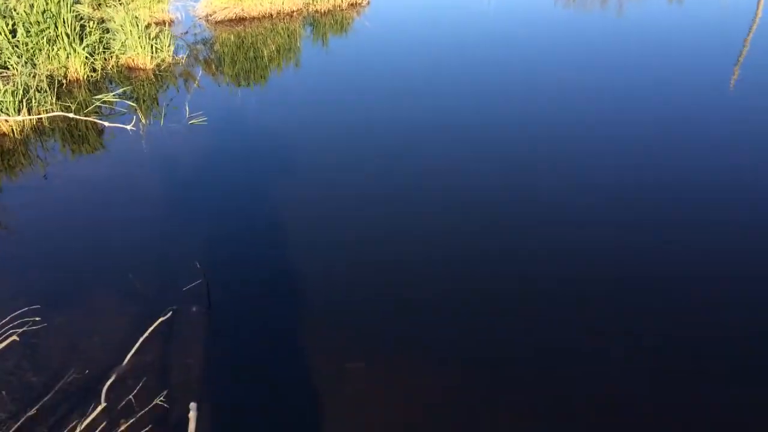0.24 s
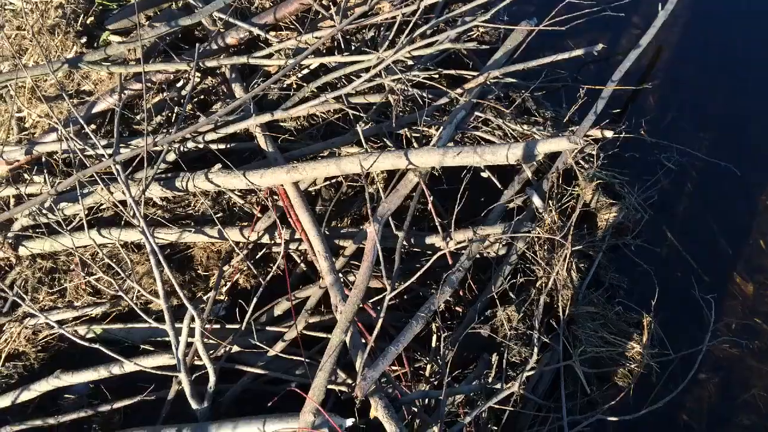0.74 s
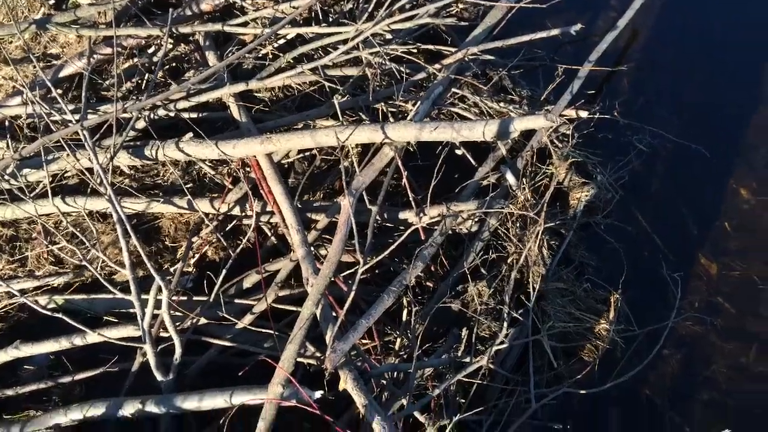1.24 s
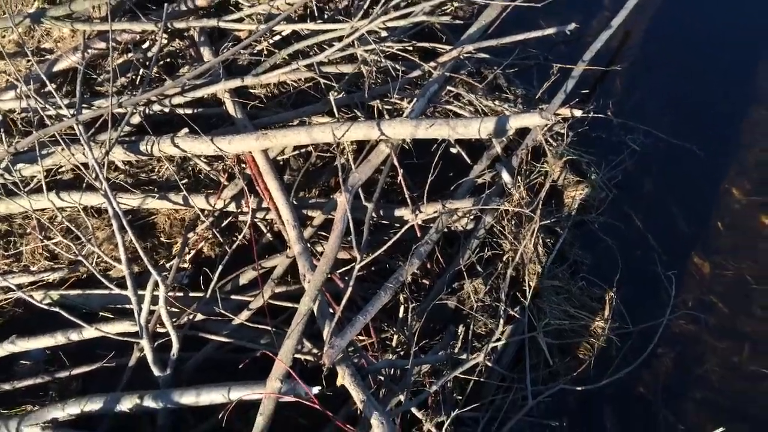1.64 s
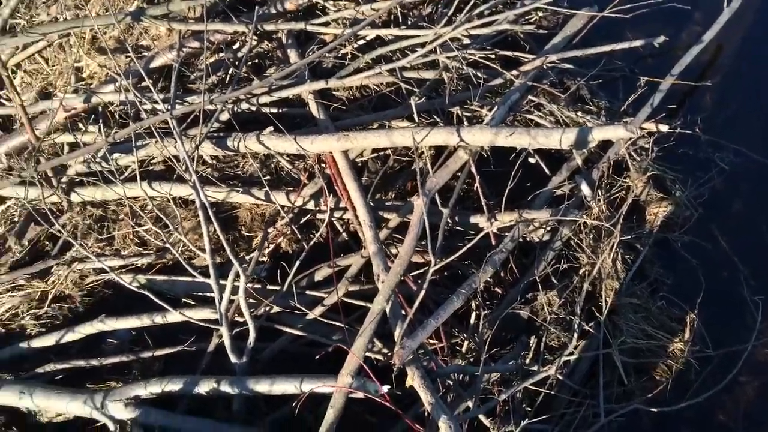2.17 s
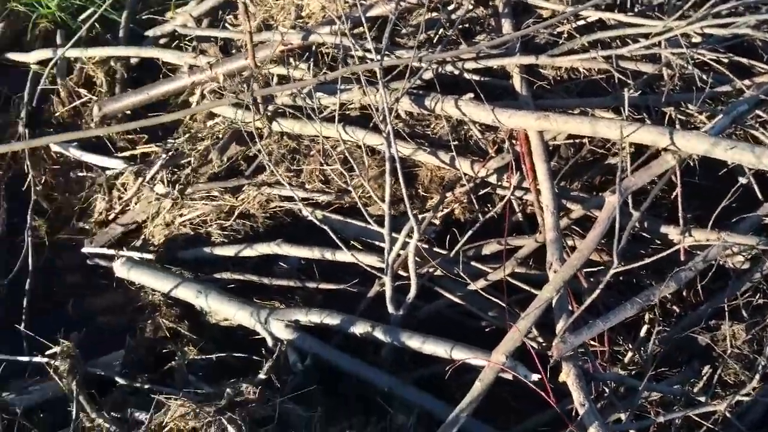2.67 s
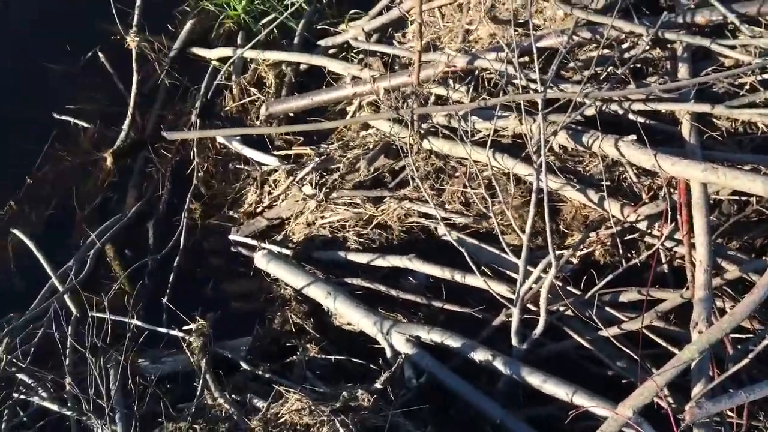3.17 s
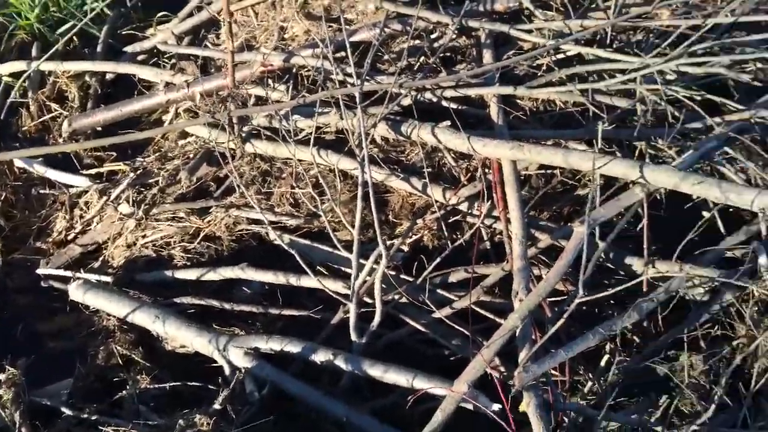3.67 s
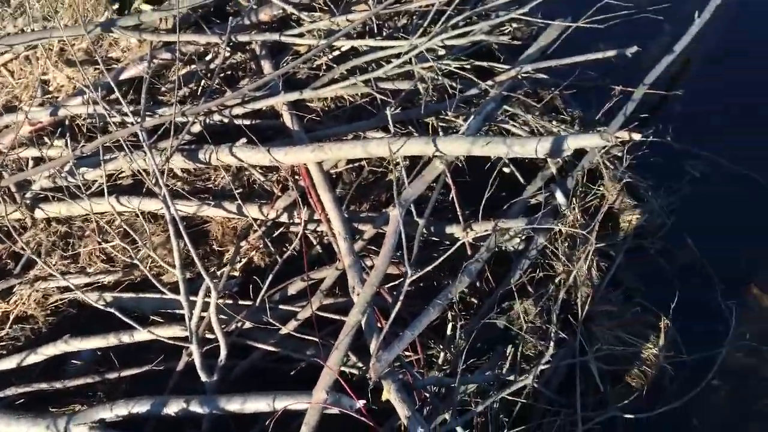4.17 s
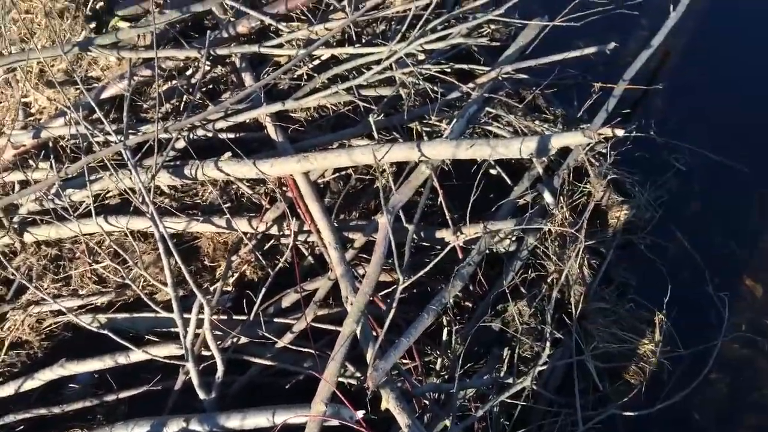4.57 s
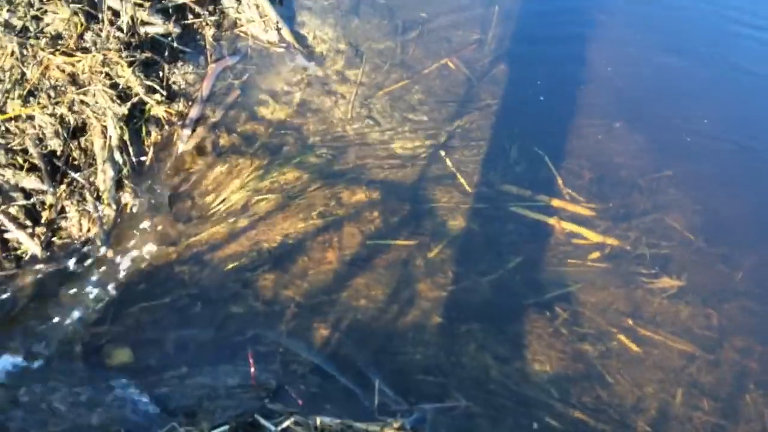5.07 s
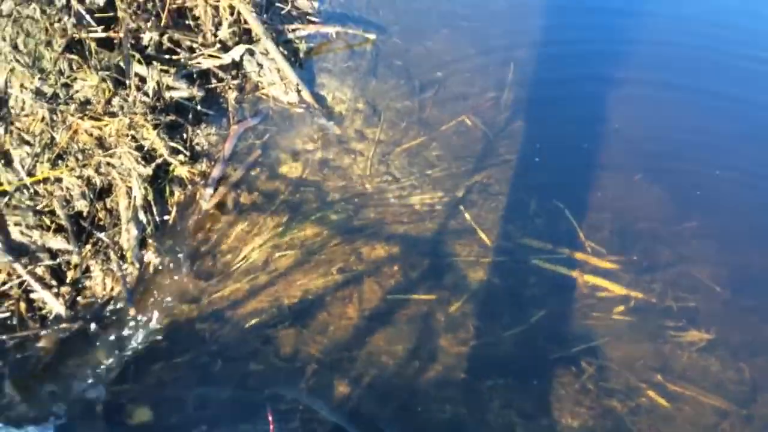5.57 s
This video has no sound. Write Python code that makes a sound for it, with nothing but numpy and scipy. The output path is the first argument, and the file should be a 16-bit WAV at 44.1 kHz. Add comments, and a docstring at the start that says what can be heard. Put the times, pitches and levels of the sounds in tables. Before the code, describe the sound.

It starts very quietly at the edge of a pond, with a faint murmur and hiss of distant running water and small drops ticking and plinking among the sticks of a dam. At about 0.7 seconds twigs brush softly and one gives a small dry crack. Light wind thuds on the microphone from then until about 2 seconds. The irregular drips continue, with two barely audible far bird whistles near 3.6 and 4.3 seconds.

At 4.6 seconds the sound cuts abruptly to a much louder, close rush of water pouring through a gap in the dam. It fizzes steadily, with bright bubbles, small splashes and hollow gurgles. Low wind rumble grows underneath, and gusts buffet the microphone around 5.3 seconds and hardest from 5.6 seconds to the end, just before 6 seconds.

```python
"""Pond and gap at a stick dam

From the bank of a still pond: distant water murmurs and hisses, drops tick and ring as bubbles among
the sticks, a twig cracks, far birds whistle faintly and wind thuds on the microphone. Then, all at
once, the microphone is close to the gap, where water rushes, fizzes and gurgles under stronger gusts."""
import sys
import numpy as np
from scipy import signal
from scipy.fft import rfft, irfft, next_fast_len
from scipy.io import wavfile
from scipy.ndimage import uniform_filter1d, map_coordinates

SR = 44100
rng = np.random.default_rng(int(sys.argv[2]) if len(sys.argv) > 2 else 0)


def transcribe(u):
    """Save the signal u as a 16-bit wav file named by the first command-line argument.

    u: samples, shape (n,) or (channels, n), limited to [-1, 1]; the rate is SR.
    q: integer samples, one column per channel.
    """
    v = np.clip(np.atleast_2d(u).T, -1, 1)
    q = np.round(v * 32767).astype(np.int16)
    wavfile.write(sys.argv[1], SR, q)


N = 256209
TIME_S = np.arange(N) / SR
NEAR_S = 4.6235  # from here on the microphone is at the gap

# Water through the gap, close up: frequency_hz, density_db
RUSH_SPECTRUM = [(150, -5.5), (250, -11.5), (308, -2.5), (435, -7), (564, -5.5), (2210, -11.5), (4050, -10),
                 (4650, -14), (7290, -14.5), (8970, -21), (14600, -19), (15600, -28)]
# Splashes in the rush: centre_s, width_s, swell_db
RUSH_SURGES = [(4.727, 0.0076, 9), (5.17, 0.022, 1), (5.746, 0.0037, 5.5)]
# Hollow gurgles in the gap that ring on: start_s, level_db, pitch_hz, life_cycles
HOLLOW_GURGLES = [(4.713, -27, 491, 14.5), (4.722, -26, 817, 10), (5.029, -25.5, 718, 8.4),
                  (5.245, -27.5, 925, 15), (5.41, -37.5, 2960, 47), (5.48, -29.5, 1340, 18),
                  (5.526, -35.5, 2760, 60)]
# Drops that stand out: start_s, bubble_db, pitch_hz, tick_db
CLEAR_DROPS = [(.164, -53.5, 1850, -72), (0.168, -54, 2620, -68), (0.331, -58, 2417, -70.5),
               (.7657, -56, 5680, -68), (.7779, -54, 7700, -55), (.832, -49, 2330, -60),
               (.8655, -54, 1390, -70), (0.889, -57, 1780, -74), (1.375, -48, 2780, -54),
               (1.5313, -51.5, 2380, -71), (1.736, -51, 3260, -51), (1.775, -50.5, 2940, -60),
               (1.815, -52.5, 4300, -57), (1.851, -47.5, 4570, -55), (1.739, -53, 2700, -70),
               (2.149, -65, 9500, -50.5), (2.336, -53, 2740, -64), (2.3905, -48.5, 3720, -56),
               (2.509, -56, 5470, -57), (2.72, -50, 1130, -69), (2.7404, -55, 2607, -56),
               (2.7723, -45.5, 2660, -61), (2.775, -50.5, 1530, -72), (2.773, -48.5, 3380, -66),
               (2.854, -42.5, 3660, -57), (3.082, -57, 4540, -68), (3.1093, -54.5, 4220, -72),
               (3.1626, -49, 3340, -49), (3.214, -58, 4540, -60), (3.3222, -46.5, 3090, -61),
               (3.337, -62, 1440, -72), (3.4937, -55, 3200, -55), (3.616, -57, 2600, -70),
               (3.642, -60, 3930, -70), (3.801, -58, 3170, -72), (3.8475, -52, 2040, -63),
               (3.854, -62, 6800, -54.5), (3.897, -50, 3250, -59), (4.091, -54, 2600, -65),
               (4.1735, -48, 3300, -62), (4.219, -47.5, 11540, -59), (4.245, -60, 5470, -55),
               (4.274, -55, 1900, -66), (4.284, -58, 6440, -52), (4.3138, -59, 6500, -55),
               (4.351, -59, 8100, -57), (4.3582, -53, 6500, -58), (4.407, -58, 7040, -58),
               (4.516, -62, 7200, -57.5), (4.56, -58, 4870, -59), (4.707, -27, 2420, -37),
               (4.7266, -26, 2400, -42), (4.729, -30, 3930, -34), (4.743, -23, 3430, -36),
               (4.762, -23, 4100, -40), (4.803, -26, 2480, -50), (4.829, -25, 4240, -43),
               (4.87, -31, 3500, -34), (4.886, -30, 4200, -41), (4.925, -24, 1550, -45),
               (4.9965, -20, 1930, -43), (4.9965, -23, 2450, -45), (5.163, -40, 9000, -29.5),
               (5.1797, -19.5, 3830, -29), (5.4126, -26, 4930, -30), (5.489, -28, 3180, -45),
               (5.491, -25, 3940, -45), (5.527, -30, 3330, -43), (5.6454, -21, 6540, -32)]
# Short chattering strings of drops: start_s, length_s, level_db, upper_pitch_ratio
DRIBBLE_RUNS = [(1.415, .031, -60.5, 0.93), (4.091, .028, -60.5, 1.01)]
# Pockets among the sticks that a dribble rings: pitch_hz, gain_db, life_cycles
POCKET_MODES = [(1320, -18.5, 11), (1830, -9.5, 14), (3090, -4.5, 25), (3860, 1.5, 27), (4360, -6.5, 20),
                (9000, -4.5, 4.2)]
# Wind eddies on the microphone: centre_s, level_db, swing_hz
EDDIES = [(.071, -49.5, 67), (0.327, -46.5, 77), (.708, -33, 98), (0.772, -40.5, 66.5), (.835, -42.5, 69),
          (.873, -38, 68), (0.931, -36.5, 111), (0.947, -39, 114), (.98, -43.5, 70.6), (1.042, -35, 79),
          (1.085, -43, 151), (1.136, -41, 120), (1.154, -36, 77), (1.221, -41, 64), (1.251, -31.5, 86.2),
          (1.349, -29.5, 61.6), (1.37, -32, 109), (1.391, -34.5, 72), (1.54, -40, 65.9), (1.573, -46, 73),
          (1.729, -38, 53.6), (1.78, -48, 90), (1.839, -49, 99), (1.872, -42.5, 59.7), (2.024, -46, 92),
          (4.56, -52.5, 80), (4.631, -25.5, 103), (4.914, -27.5, 124), (4.972, -18.5, 168),
          (5.132, -26, 134), (5.25, -20.5, 136), (5.298, -15, 150), (5.318, -18, 177), (5.333, -18, 127),
          (5.625, -15.5, 148), (5.644, -10.5, 104), (5.664, -16, 181), (5.681, -15, 128),
          (5.694, -20.5, 197), (5.708, -14, 140), (5.758, -14, 170), (5.762, -13, 356), (5.771, -9.5, 94),
          (5.792, -13, 130), (5.797, -16.5, 420)]
# Wind rumble at the gap: frequency_hz, density_db
RUMBLE_SPECTRUM = [(15, -45), (25, -23), (59, 4.5), (82, 5), (146, -2), (199, -1), (292, -16.5),
                   (400, -17.5), (520, -29), (880, -120)]
# Cracks of a dry twig: start_s, level_db, tilt_db_per_octave
TWIG_CRACKS = [(0.648, -55, -7), (0.8037, -40.5, 3.3)]
# Resonances of that twig: pitch_hz, gain_db, t60_s
TWIG_MODES = [(606, -12, 0.012), (1369, -4.5, 0.01), (3290, 1.5, 0.005), (5100, 6.5, 0.0017),
              (11900, -7, 0.0028)]
# Twigs brushing together: time_s, level_db
BRUSHING_LEVEL = [(.66, -76), (.69, -66), (.77, -66.5), (.79, -74), (.9, -71), (1, -85)]
# Distant flow, driving both murmur and hiss: time_s, level_db
FAR_FLOW = [(0, -69.5), (.6, -71), (.72, -65.5), (1.05, -67), (1.65, -70), (2.1, -69.5), (2.35, -65.5),
            (2.75, -64), (3.35, -71), (3.7, -66), (4.1, -71.5), (4.6, -69.5)]
# Low murmur of the distant water: frequency_hz, density_db
MURMUR_SPECTRUM = [(88, -34), (150, -0.5), (235, -2), (475, 0.5), (700, -9.5), (1020, -7), (2500, -16.5),
                   (3250, -27.5), (5500, -120)]
# Hiss of the distant water: frequency_hz, density_db
HISS_SPECTRUM = [(710, -4.5), (1200, -18), (2570, -8), (3280, -2), (5150, -5), (12800, -9), (15500, -13)]
# Light air at the pond: frequency_hz, density_db
BREEZE_SPECTRUM = [(30, -6.5), (80, 1), (140, -6), (220, -24.5), (400, -42.5)]
# Moments when the breeze freshens: start_s, hold_s, swell_db
BREEZE_BLOWS = [(0.652, 0.79, 12), (1.492, 0.062, 9.5), (1.698, 0.15, 6), (1.98, 0.21, 2.5)]
# Far birds, one list of points per whistle: time_s, pitch_hz, level_db
BIRD_CALLS = [
    [(3.584, 5300, -78), (3.597, 5700, -73), (3.617, 5150, -72)],
    [(4.28, 1850, -84), (4.3, 1980, -81), (4.33, 2220, -74), (4.375, 2500, -82)],
]


def rush():
    """Water pours through the gap, close up: patchy noise and a fizz of bubbles share one colour."""
    crest_s, crest_db, sag_db_per_s2 = 5.115, -35.5, 6
    near = slice(round(NEAR_S * SR), N)
    cloud = swarm(2600, NEAR_S - 0.02, N / SR, db=0, spread_db=2, hz=2801, octaves=1.3, cycles=7.87)
    fizz = bubbles(*cloud, rise=0.159)
    sheet = patchy(3, bins=8, frames=4) * amp(1.56 * wobble(50))
    water = coloured(sheet + amp(-3.5) * fizz / np.std(fizz[near]), RUSH_SPECTRUM)
    flow_db = crest_db - sag_db_per_s2 * (TIME_S - crest_s) ** 2
    surge_db = sum(db * np.exp(-((TIME_S - s) / width) ** 2) for s, width, db in RUSH_SURGES)
    return amp(flow_db + surge_db) * water / np.std(water[near])


def gurgles():
    """Hollow bubbles sound under the rush; a few louder ones ring on."""
    cloud = swarm(130, NEAR_S, N / SR, db=-45.5, spread_db=2, hz=1304, octaves=0.917, cycles=16)
    soft = bubbles(*cloud, rise=0.06, samples=1500, onset_cycles=0.69)
    return soft + bubbles(*np.transpose(HOLLOW_GURGLES), rise=0.017, samples=2200, onset_cycles=2.1)


def drops():
    """Each drop lands with a tick and traps a bubble, after a short splat near its pitch."""
    s, db, hz, tick_db = np.transpose(CLEAR_DROPS)
    lead, detune, linger = rng.standard_normal((len(s), 3)).T
    life_share = np.where(s > NEAR_S, 0.42, 1)  # bubbles die sooner in the churning gap
    cycles = 18.5 * (hz / 3000) ** 0.34 * life_share * np.exp(0.1 * linger)
    splat_hz = 1.11 * hz * np.exp(0.093 * detune)
    splat = bubbles(s - 0.0005 * abs(lead), db - 3, splat_hz, 0.44 * cycles, rise=-0.064, onset_cycles=1.5)
    ring = bubbles(s, db, hz, cycles, rise=-0.015, onset_cycles=0.85)
    return ring + splat + spray(s, tick_db, fade_s=0.0022)


def thicket(x):
    """The tangle of sticks scatters each drop into a short soft tail."""
    t, t60_s = np.arange(2000) / SR, 0.032
    tail = rng.standard_normal(len(t)) * amp(-60 * t / t60_s)
    return x + amp(-4.5) * signal.fftconvolve(x, tail / np.linalg.norm(tail))[:N]


def gusts():
    """Each eddy sucks the microphone's diaphragm out and lets it swing; hard ones turn sharp and rasp."""
    out, t = np.zeros(N + 2 * SR), np.arange(-SR // 8, SR // 8) / SR
    width_cycles = 1.47
    rasp_spectrum = [(20, -24), (100, 8.5), (250, -5.5), (480, -3.5), (750, -15), (1300, -39), (3000, -88)]
    for s, db, hz in EDDIES:
        envelope = amp(db) * np.exp(-2.8 * (t * hz / width_cycles) ** 2)
        hardness = amp(-11.5 + 1.03 * (db + 15.5))
        phase = 2 * np.pi * hz * t * (1 + rng.normal(0, 10.4) * t) + rng.normal(0, 0.61)
        phase += (0.17 + 0.73 * hardness) * np.sin(phase)  # steep flanks add overtones
        rasp = hardness * coloured(rng.standard_normal(len(t)), rasp_spectrum)
        out[round(s * SR) + SR - SR // 8:][:len(t)] += envelope * (rasp - np.cos(phase))
    return out[SR:SR + N]


def rumble():
    """Low, fluttering wind on the microphone at the gap, growing all the while."""
    arrival_db, growth_db_per_s = -39, 8.5
    air = amp(2.3 * wobble(28)) * coloured(rng.standard_normal(N), RUMBLE_SPECTRUM)
    return amp(arrival_db + growth_db_per_s * (TIME_S - NEAR_S)) * unit(air)


def twigs():
    """Each crack rings the twig's modes; brushing twigs add a soft, narrow noise."""
    out, t = np.zeros(N), np.arange(2000) / SR
    for s, db, tilt_db in TWIG_CRACKS:
        for hz, gain_db, t60_s in TWIG_MODES:
            mode_db = db + gain_db + tilt_db * np.log2(hz / 3000) + rng.normal(0, 2.9)
            out[round(s * SR):][:len(t)] += amp(mode_db - 60 * t / t60_s) * np.sin(2 * np.pi * hz * t)
    brushing = coloured(patchy(3, bins=2, frames=8), [
        (300, -28), (500, -3), (900, -9), (1240, -13), (1390, 3), (1580, -14), (2000, -11.5), (4000, -39)])
    return out + amp(curves(BRUSHING_LEVEL)[0]) * brushing


def dribbles():
    """A quick uneven string of drops rings the same few pockets and blurs into a rough chirr."""
    out, count = np.zeros(N), 24
    for start, length, db, upper_ratio in DRIBBLE_RUNS:
        lag, size = rng.random((count, 2)).T
        s = start + length * (np.arange(count) + 0.91 + 0.64 * lag) / 21
        drop_db = db + 9 * size - 30 * ((s - start) / length - 0.55) ** 2  # the string swells and tapers
        for hz, gain_db, cycles in POCKET_MODES:
            pitch = hz * (upper_ratio if hz > 3500 else 1) * np.exp(0.012 * rng.standard_normal(count))
            out += bubbles(s, drop_db + gain_db, pitch, np.full(count, cycles), rise=0.03)
    return out


def trickle():
    """Many faint drops ring as bubbles among the twigs; one in four also ticks."""
    s, db, hz, cycles = swarm(420, 0, NEAR_S, db=-67, spread_db=3, hz=3304, octaves=0.85, cycles=12.3)
    return bubbles(s, db, hz, cycles, rise=0.032) + spray(s[::4], db[::4] - 5.5, fade_s=0.0063)


def far_water():
    """Running water heard from a distance: murmur and hiss rise and fall with one flow."""
    flow_db, = curves(FAR_FLOW)
    murmur_db = flow_db + 1 + 1.6 * wobble(4.9)
    hiss_db = -74.5 + 0.96 * (flow_db + 69)
    murmur = amp(murmur_db) * coloured(patchy(0.99, bins=2, frames=20), MURMUR_SPECTRUM)
    return murmur + amp(hiss_db) * coloured(patchy(2.8, bins=8, frames=6), HISS_SPECTRUM)


def breeze():
    """Light air on the microphone at the pond, freshening in short blows."""
    lull_db, edge_s = -68, 0.029
    blow_db = sum(db * np.clip(np.minimum(TIME_S - s, s + hold - TIME_S) / edge_s + 1, 0, 1)
                  for s, hold, db in BREEZE_BLOWS)
    air = amp(1.5 * wobble(18)) * coloured(rng.standard_normal(N), BREEZE_SPECTRUM)
    return amp(lull_db + blow_db) * unit(air)


def birds():
    """Faint, unsteady whistles from far off: a short arch, later a slow rise."""
    out = np.zeros(N)
    for call in BIRD_CALLS:
        hz, db = curves(call)
        phase = 2 * np.pi * np.cumsum(hz * (1 + 0.0147 * wobble(200))) / SR
        singing = (TIME_S > call[0][0]) & (TIME_S < call[-1][0])
        out += singing * amp(db + 4.5 * wobble(110)) * np.sin(phase)
    return out


def bubbles(s, db, hz, cycles, rise, samples=600, onset_cycles=0.16):
    """Trapped air rings as damped sines, 20 dB down after `cycles`; `rise` sets the pitch glide."""
    turns = hz[:, None] * (np.arange(samples) / SR)
    life = turns / np.maximum(cycles, 1)[:, None]
    wave = np.sin(2 * np.pi * turns * (1 + rise * np.minimum(life, 1.5)))
    wave *= amp(db)[:, None] * np.exp(-2.3 * life) * (1 - np.exp(-turns / onset_cycles))
    at = (s * SR).astype(int)[:, None] + np.arange(samples)
    return np.bincount(at.ravel(), wave.ravel(), N + samples)[:N]


def swarm(count, start_s, stop_s, db, spread_db, hz, octaves, cycles):
    """Bubbles at random moments, few of them loud: start_s, level_db, pitch_hz, life_cycles."""
    moment, faintness = rng.random((count, 2)).T
    detune, linger = rng.standard_normal((count, 2)).T
    pitch = np.clip(hz * 2 ** (octaves * detune), 400, 14000)
    level_db = db - spread_db * np.log(faintness + 0.062) + 3 * np.log2(pitch / hz)
    return start_s + (stop_s - start_s) * moment, level_db, pitch, cycles * np.exp(0.51 * linger)


def spray(s, db, fade_s):
    """A short tick of treble noise where each drop lands; each has its own colour."""
    landings = np.bincount((s * SR).astype(int), amp(db), N)[:N]
    t = np.arange(800) / SR
    envelope = signal.fftconvolve(landings, (1 - np.exp(-t / 0.00065)) * np.exp(-t / fade_s))[:N]
    noise = patchy(2.6, bins=10, frames=3)
    return envelope * coloured(noise, [(3000, -8.5), (6500, -4), (11000, -3.5), (16000, -6.5)])


def patchy(depth_db, bins, frames):
    """White noise with patches of random gain in time and frequency."""
    cells = signal.stft(rng.standard_normal(N + 256), nperseg=256)[2]
    patches = uniform_filter1d(uniform_filter1d(rng.standard_normal(cells.shape), bins, 0), frames, 1)
    return signal.istft(cells * amp(depth_db * unit(patches)), nperseg=256)[1][:N]


def coloured(x, spectrum):
    """x shaped by (frequency_hz, gain_db) points on a log axis, brought to rms 1."""
    size = next_fast_len(len(x) + 8192)
    hz, db = np.transpose(spectrum)
    gain = amp(np.interp(np.log(np.fft.rfftfreq(size, 1 / SR) + 1), np.log(hz + 1), db))
    return unit(irfft(rfft(x, size) * gain, size)[:len(x)])


def wobble(rate):
    """A smooth random curve, `rate` knots a second."""
    return map_coordinates(rng.standard_normal(int(N * rate / SR) + 4), [TIME_S * rate])


def curves(rows):
    """One value per sample for each column after the time."""
    s, *columns = np.transpose(rows)
    return [np.interp(TIME_S, s, column) for column in columns]


def amp(db):
    return 10 ** (np.asarray(db) / 20)


def unit(x):
    return x / np.sqrt(np.mean(x ** 2) + 1e-20)


def scene():
    """One microphone, first by the pond, then abruptly at the gap; drops and gusts sound in both places."""
    close = np.clip((TIME_S - NEAR_S) / 0.00079, 0, 1)
    pond = far_water() + breeze() + trickle() + dribbles() + twigs() + birds()
    gap = rush() + rumble() + gurgles()
    return ((1 - close) * pond + close * gap + thicket(drops()) + gusts())[None]


def record(dry):
    """The microphone loses the deepest bass; the recorder keeps nothing above its band limit."""
    bass_hz, top_hz = 30, 15600
    size = next_fast_len(N + 8192)
    hz = np.fft.rfftfreq(size, 1 / SR)
    bass_cut = (1j * hz / (1j * hz + bass_hz)) ** 2
    return irfft(rfft(dry, size) * bass_cut * (hz < top_hz), size)[:, :N]


dry = scene()
out = record(dry)
transcribe(out)
```